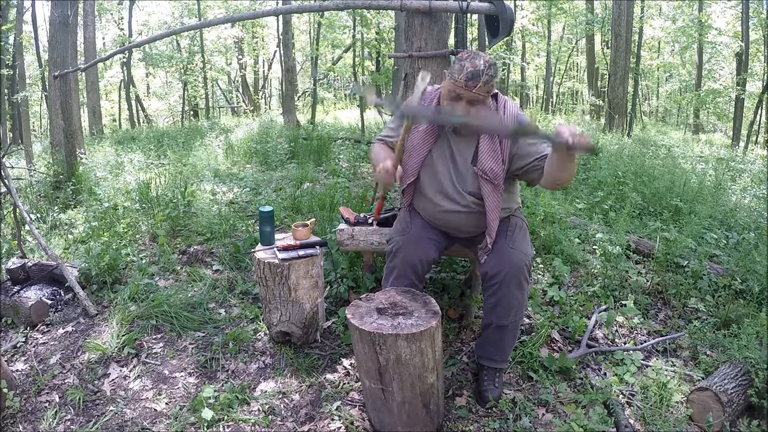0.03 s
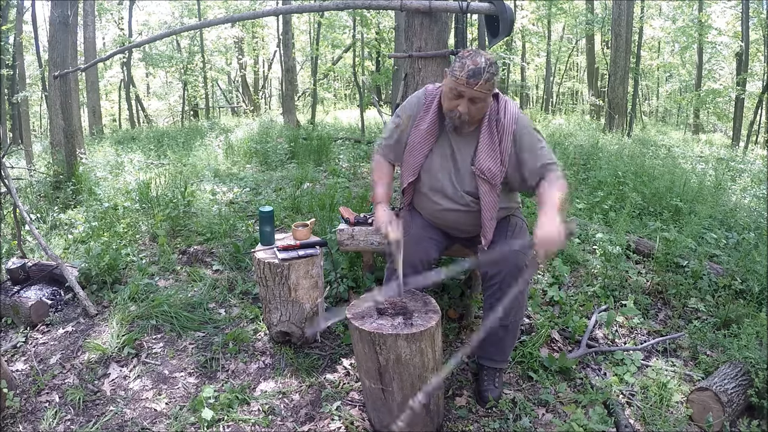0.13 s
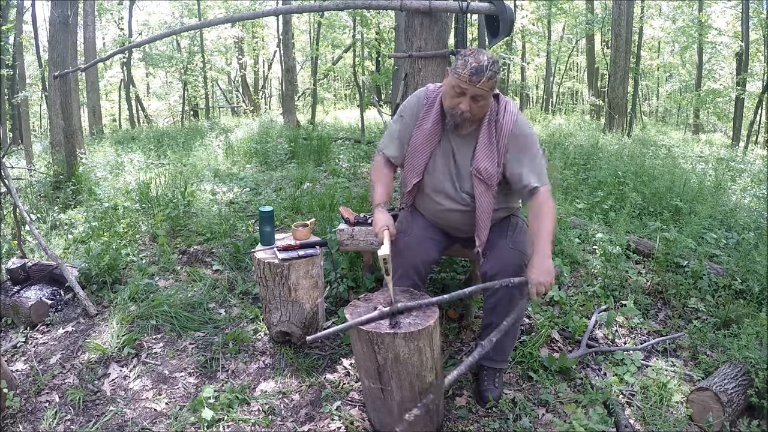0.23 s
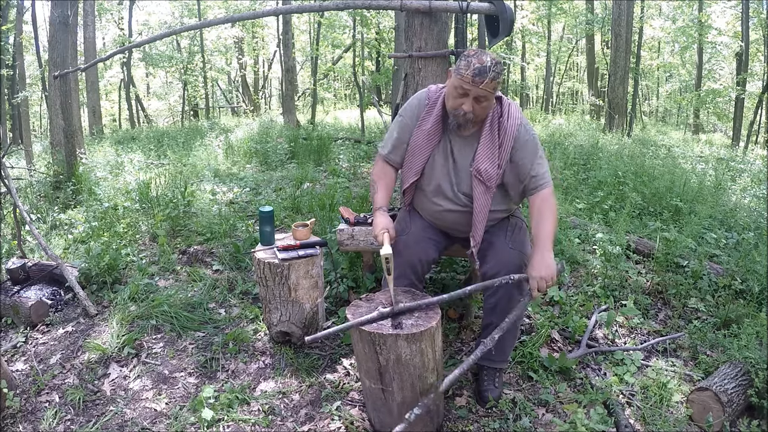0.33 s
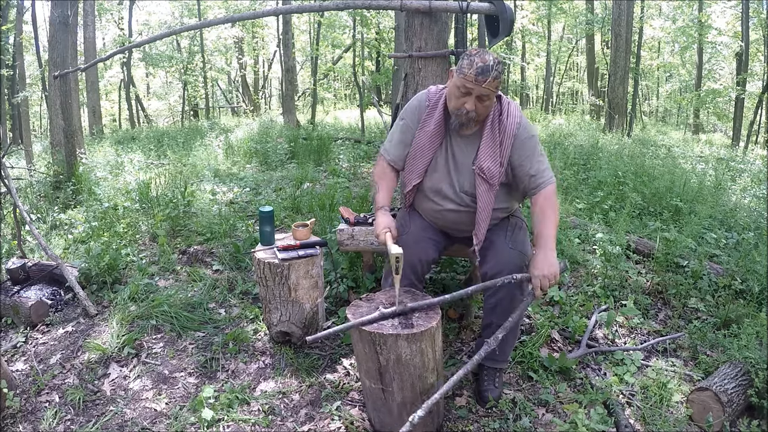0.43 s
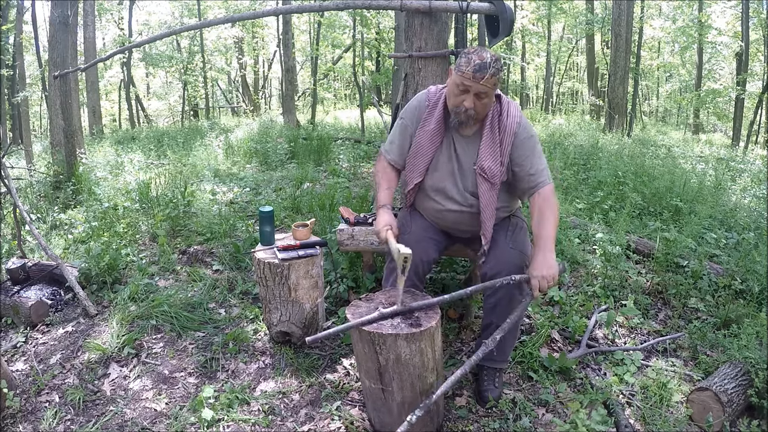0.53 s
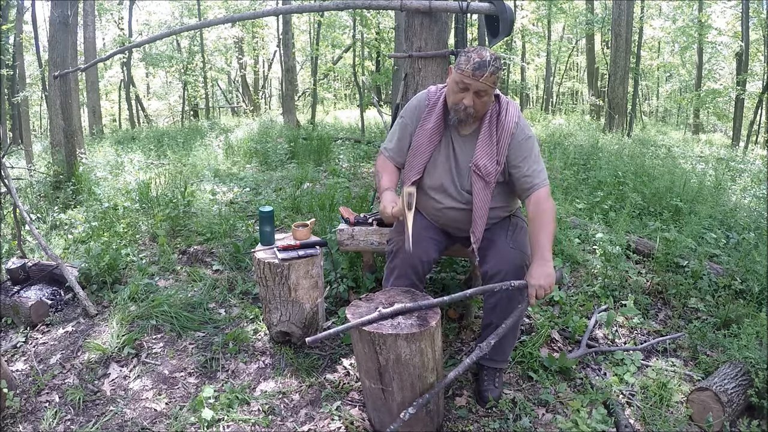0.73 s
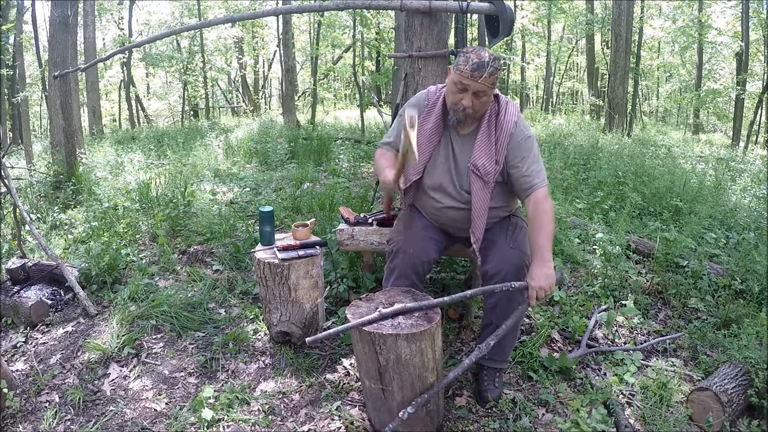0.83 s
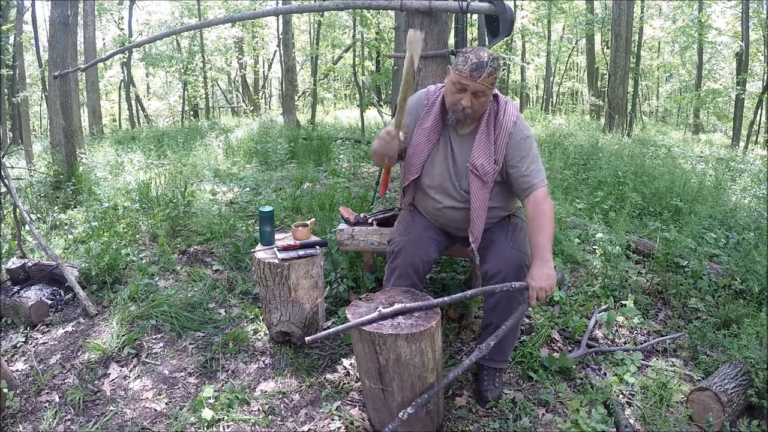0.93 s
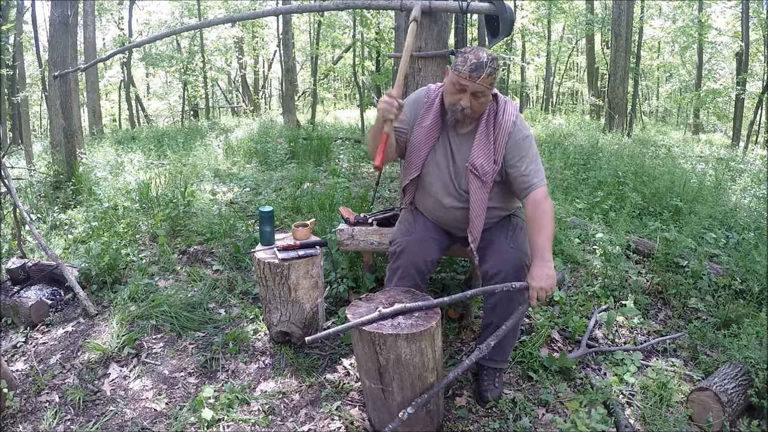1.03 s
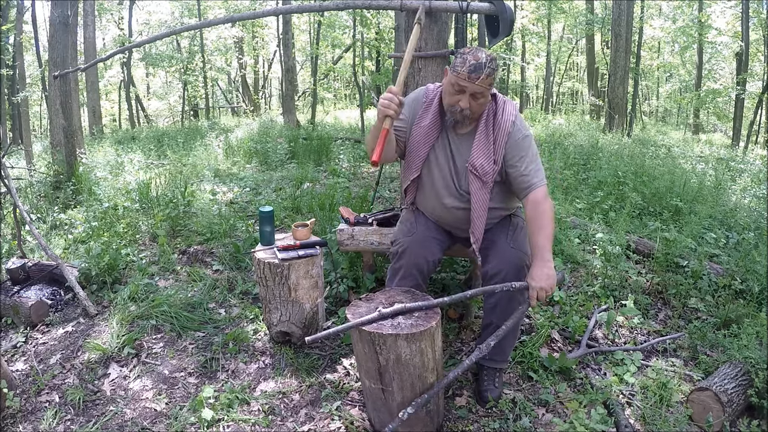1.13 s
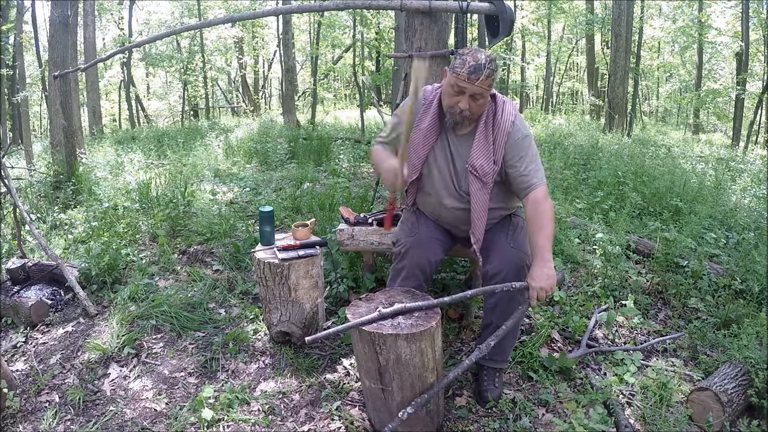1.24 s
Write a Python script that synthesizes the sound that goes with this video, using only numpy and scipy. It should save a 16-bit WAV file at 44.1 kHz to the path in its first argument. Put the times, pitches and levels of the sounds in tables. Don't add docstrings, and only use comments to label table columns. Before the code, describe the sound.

Outdoors in woods, faint rustling precedes one loud, dry, woody hatchet crack at medium distance; the branch knocks back, trees scatter a brief tail, then quiet leaves, tiny ticks, a faint bird and wind buffeting the microphone.

```python
import sys
import numpy as np
from scipy import signal
from scipy.fft import rfft, irfft
from scipy.io import wavfile
from scipy.ndimage import uniform_filter1d

SR = 44100
rng = np.random.default_rng(int(sys.argv[2]) if len(sys.argv) > 2 else 0)


def invert_db(level):
    return 10 ** (np.asarray(level, dtype=float) / 20)


def unload_audio(sound):
    columns = np.transpose(np.atleast_2d(sound))
    steps = np.round(np.clip(columns, -1, 1) * 32767)
    wavfile.write(sys.argv[1], SR, steps.astype(np.int16))


N = 57330

# start in seconds, level in dB, length of the push in ms.
CRACKS = [(.2022, -14.5, 0.29), (0.2044, -14.5, .3), (0.2061, -10.5, 0.41), (.2087, -14.5, .25),
          (.2110, -19, 0.23), (.2160, -18.5, .3), (0.219, -17, .5), (.2240, -13, 0.69),
          (0.2282, -17.5, .48), (.2320, -19.5, .47), (0.2374, -26.5, 0.13), (0.2377, -22, .3),
          (0.241, -21.5, .32), (0.251, -28, 0.69), (.2540, -29, 0.606)]
BLOW_S = CRACKS[0][0]
# frequency in Hz, level in dB, 60 dB decay time in seconds.
WOOD_MODES = [(204, -2.5, 0.14), (254, -3, 0.047), (485, -6.5, 0.017), (616.8, -1.5, 0.081),
              (718.7, 2, .055), (998, -5.5, 0.095), (1122, -0.5, 0.029), (1246, -1, 0.013),
              (1437, -2, 0.024), (1503, 0, 0.062), (1596, 2.5, .05), (2102, -2, 0.073), (2530, -3.5, 0.052),
              (2927, -7.5, 0.031)]
# start in seconds, level in dB, pitch in Hz, 60 dB decay time in seconds.
FIBRE_SPLITS = [(0.202, -17.5, 4270, 0.0074), (0.2025, -14.5, 1620, 0.0035), (.2027, -14.5, 1020, .009),
                (0.2024, -19.5, 2680, 0.0097), (0.2035, -15, 3700, .009), (0.2042, -10.5, 1420, .01),
                (.2040, -26, 5600, .008), (0.206, -15.5, 2122, .009), (.2040, -16.5, 661.7, .02),
                (.2080, -19, 2680, .009), (0.2092, -11.5, 4015, .009), (0.2091, -7.5, 1234, .01),
                (0.209, -7.5, 2902, .014), (.2089, -31, 9000, .006), (.2091, -36, 12500, .005),
                (.2086, -24.5, 6200, .008), (.2100, -19, 202, .06), (.2105, -24.5, 6700, .008),
                (0.2108, -12.5, 1805, .009), (0.2101, -19.5, 5300, .009), (.2120, -15, 2200, .009),
                (0.2127, -17, 2907, .012), (0.2126, -19.5, 3987, .016), (0.2155, -19, 2290, .016),
                (0.2153, -20, 4505, .009), (0.2156, -11, 1110, .009), (0.2166, -16.5, 3240, .009),
                (0.2189, -20, 1116, 0.0082), (0.2189, -25, 2480, .016), (0.2204, -18.5, 495.4, 0.015),
                (0.221, -19.5, 954, .009), (0.2222, -14, 1662, .009), (.2230, -15, 2382, .012),
                (.2239, -20, 750, 0.035), (0.2244, -20, 1180, 0.033), (0.2246, -15, 1471, 0.014),
                (.2250, -21, 3276, 0.0055), (0.2287, -20, 485.4, .028), (.2301, -23, 1662, .028),
                (.2318, -27.5, 740, .028), (.2324, -28.5, 2037, .028), (.2372, -32.5, 4180, .012),
                (.2383, -27, 1596, .028), (0.2399, -28.5, 2490, 0.025), (0.2388, -22.5, 1192, 0.036),
                (0.24, -32.5, 3000, .014), (.2500, -31.5, 800, .02), (0.254, -37, 1190, .016)]
# frequency in Hz, level in dB.
TEAR_SPECTRUM = [(120, -37.5), (200, -6), (899, -7.5), (1160, 1), (1980, -9.5), (2910, -6.5), (14900, -50),
                 (16000, -50.5)]
WOOD_DB, STUMP_CUT_HZ = -21, 170
SPIT_DB, SPIT_T60_S, SPIT_CUT_HZ = -27.5, 0.01, 4900
TEAR_PER_S, TEAR_DB, TEAR_SPREAD_DB, TEAR_HOLD_S, TEAR_T60_S = 3000, -25, 2.5, 0.026, 0.076

# frequency in Hz, level in dB.
TRUNK_SPECTRUM = [(120, -36), (200, 6), (273, -8.5), (1140, -5.5), (1900, -10), (3000, -6), (5400, -14.5),
                  (15000, -46.5)]
# start in seconds, level in dB, 60 dB decay time in seconds.
LATER_RETURNS = [
    (.2560, -55, .12),
    (0.2925, -44.5, 0.049),
    (.3080, -57, 0.05),
    (0.359, -67.5, 0.095),
]
ECHO_DB, ECHO_FLUTTER_DB = -39, 1.2
ECHO_T60_LOW_S, ECHO_T60_MID_S, ECHO_T60_HIGH_S = 0.38, 0.48, 0.25
LATE_DB, LATE_T60_S = -61, 2.5

# start in seconds, level in dB, pitch in Hz, 60 dB decay time in seconds.
KNOCKS = [
    (.2946, -29.5, 1096, 0.027),
    (0.24, -33, 2010, 0.016),
    (.2985, -29, 760, 0.023),
    (.2975, -43, 587, 0.033),
    (0.22, -43.5, 1020, .015),
    (.3110, -39, 740, 0.016),
]
# start in seconds, level in dB, pitch in Hz, 60 dB decay time in seconds.
TWIG_TICKS = [(.0200, -47.5, 3620, 0.02), (0.0201, -52.5, 1750, 0.018), (.0970, -57.5, 3670, 0.02),
              (0.1251, -60, 3730, 0.029), (.1280, -54, 1930, 0.014), (.1450, -56.5, 3000, 0.011),
              (.1550, -58, 3570, 0.014), (0.258, -54.5, 9520, 0.026), (0.276, -42, 4400, 0.016),
              (0.2965, -45, 5100, 0.012), (0.32, -61, 9800, 0.0056), (0.458, -49.5, 8700, 0.0055),
              (0.4592, -53, 3800, 0.014), (0.469, -54.5, 9860, 0.0083), (0.539, -61, 5560, 0.017),
              (.6890, -49, 3540, 0.014), (0.6901, -49.5, 6030, 0.0088), (0.6892, -57, 9800, 0.01),
              (.7770, -59, 3780, 0.0073), (0.911, -61, 1235, 0.021), (1.196, -61.5, 2080, 0.023),
              (1.195, -58.5, 4110, 0.015), (0.912, -66, 3125, 0.012)]
TICK_HISS_DB, TICK_BAND_RATIO = -3, 1.4

# start in seconds, length in seconds, starting pitch in Hz.
WHISTLES = [
    (.582, .15, 2580),
    (.858, .14, 2560),
]
# time in seconds, level in dB.
BIRD_EFFORT = [(.578, -77), (.59, -69), (.62, -66), (.642, -65.5), (.65, -84), (.66, -60), (.672, -77),
               (.685, -71.5), (.72, -68), (.735, -92), (.855, -88), (.87, -74), (.9, -68), (.909, -78),
               (.92, -67), (.945, -68.5), (.975, -75), (1.0, -78)]
SAG_HZ, SAG_POWER = 490, 2.4
BIRD_ECHO_DB, BIRD_T60_S = -5.5, 0.5

# frequency in Hz, level in dB.
LEAF_SPECTRUM = [(88, -27.5), (150, -2.5), (391, -19.5), (475, -16.5), (790, -22), (2450, -26.5),
                 (5050, -30), (12000, -41), (16000, -41)]
# time in seconds, level in dB.
RUSTLE = [
    (0, -64.5),
    (.03, -66),
    (.076, -73),
    (0.128, -66.5),
    (.195, -82),
]
LEAVES_DB, FLICKER_DB = -63.5, 1.2
RUSTLE_DB, GRAIN_DB = -2.5, 2.5

# frequency in Hz, level in dB.
WIND_SPECTRUM = [(8.8, -27), (15, -4), (38, 0.5), (61, -3), (77, -1.5), (119, -22), (300, -46.5),
                 (390, -74), (660, -120)]
# time in seconds, level in dB, pitch of the eddies in Hz,
# level in dB of the broad flow beside them.
GUSTS = [(0, -26, 49.8, -1.5), (.068, -54.5, 58.4, -1), (.1, -40.5, 58.3, 2.5), (.22, -35, 59.6, 2),
         (.285, -29.5, 37.89, -2), (.345, -43, 42.12, -8.5), (.398, -27, 41.15, -16),
         (.444, -43.5, 40.34, -8.5), (.5, -33, 37.03, -3), (.575, -29.5, 47.76, -6),
         (.635, -40, 61.82, -1.5), (.71, -31.5, 55.5, -4.5), (.8, -42, 65.53, 1), (.945, -32, 64.85, -4),
         (.975, -44.5, 60.45, -1.5), (1.08, -33.5, 47.01, -0.5), (1.15, -38, 41.85, -2.5),
         (1.27, -35.5, 56.1, -1)]
# start in seconds, level in dB, length in ms.
BUFFETS = [
    (.305, -31, 7.9),
    (0.514, -31.5, 7.4),
    (.546, -32.5, 6.9),
    (.587, -38.5, 8),
    (1.046, -37.5, 8.2),
    (1.086, -31.5, 11.3),
    (1.196, -36, 8.5),
    (1.217, -29.5, 8),
]
EDDY_WIDTH_HZ, EDDY_DB, EDDY_WANDER_RAD = 10, 2, 0.81
LULL_S, ONSET_DIP, ONSET_S = 0.013, 0.68, 0.006

# start in seconds, end in seconds.
TOP_OPEN = [
    (0, .09),
    (.125, .15),
    (.2, .535),
    (.575, .66),
    (.686, .696),
    (.74, .75),
    (.762, .83),
    (.975, 1.022),
    (1.19, 1.2),
    (1.21, 1.255),
]
TOP_HZ, GATE_HZ, GATE_DB = 15350, 12900, -24


def unit(x):
    return x / np.sqrt(np.mean(x ** 2) + 1e-30)


def colour(x, table):
    hz, db = np.array(table, float).T
    f = np.arange(N // 2 + 1) * SR / N + 1
    log_gain = np.interp(np.log(f), np.log(hz), db) * np.log(10) / 20
    cepstrum = irfft(log_gain, N)
    cepstrum[1:N // 2] *= 2
    cepstrum[N // 2 + 1:] = 0
    return irfft(rfft(x, N) * np.exp(rfft(cepstrum)), N)


def ring(force, modes):
    out = 0
    for hz, db, t60 in modes:
        pole = np.exp(2j * np.pi * hz / SR - np.log(1000) / (max(t60, 0.002) * SR))
        out = out + invert_db(db) * signal.lfilter([1], [1, -pole], force).imag
    return out


def push(start, db, ms):
    u = (np.arange(N) / SR - start) / (max(ms, 0.05) / 1000)
    bump = np.where((u > 0) & (u < 1), np.sin(np.pi * u) ** 2, 0)
    return invert_db(db) * bump / (bump.sum() + 1e-9)


def fade(start, t60, rise=0.0005):
    u = np.maximum(np.arange(N) / SR - start, 0)
    return (1 - np.exp(-u / rise)) * invert_db(-60 * u / t60)


def walk(rate):
    k = int(SR / rate)
    steps = np.repeat(rng.standard_normal(N // k + 1), k)
    smooth = uniform_filter1d(uniform_filter1d(steps, k), k)
    return unit(smooth[:N])


def struck(hits):
    return sum(ring(push(s, db, 0.11), [(hz, 0, t60)]) for s, db, hz, t60 in hits)


def branch_and_stump():
    force = sum((-1) ** k * push(s, db, ms) for k, (s, db, ms) in enumerate(CRACKS))
    return invert_db(WOOD_DB) * ring(force, WOOD_MODES)


def crack_spit():
    noise = unit(signal.lfilter(*signal.butter(2, SPIT_CUT_HZ, fs=SR), rng.standard_normal(N)))
    bursts = sum(invert_db(db + SPIT_DB) / ms * fade(s, SPIT_T60_S, 0.0001) for s, db, ms in CRACKS)
    return noise * bursts


def tearing_fibres():
    happens = rng.random(N) < TEAR_PER_S / SR
    snaps = happens * rng.standard_normal(N) * invert_db(TEAR_SPREAD_DB * rng.exponential(size=N))
    t = np.arange(N) / SR
    envelope = (t > BLOW_S) * invert_db(-60 * np.maximum(t - BLOW_S - TEAR_HOLD_S, 0) / TEAR_T60_S)
    return invert_db(TEAR_DB) * envelope * unit(colour(snaps, TEAR_SPECTRUM))


def blow():
    chop = branch_and_stump() + struck(FIBRE_SPLITS) + crack_spit() + tearing_fibres()
    return signal.lfilter(*signal.butter(2, STUMP_CUT_HZ, "high", fs=SR), chop)


def echo():
    noise = unit(colour(rng.standard_normal(N), TRUNK_SPECTRUM))
    low = signal.sosfilt(signal.butter(2, 1800, fs=SR, output="sos"), noise)
    high = signal.sosfilt(signal.butter(2, 6000, "high", fs=SR, output="sos"), noise)
    mid = noise - low - high
    bands = ((low, ECHO_T60_LOW_S), (mid, ECHO_T60_MID_S), (high, ECHO_T60_HIGH_S))
    tail = sum(band * fade(BLOW_S, t60, 0.0022) for band, t60 in bands)
    returns = (noise - low) * sum(invert_db(db) * fade(s, t60, 0.002) for s, db, t60 in LATER_RETURNS)
    slopes = invert_db(LATE_DB) * noise * fade(BLOW_S, LATE_T60_S, 0.022)
    return invert_db(ECHO_DB + ECHO_FLUTTER_DB * walk(90)) * tail + returns + slopes


def rebound():
    return struck(KNOCKS)


def twigs():
    out = 0
    for s, db, hz, t60 in TWIG_TICKS:
        edges = [hz / TICK_BAND_RATIO, min(hz * TICK_BAND_RATIO, 0.45 * SR)]
        band = signal.butter(3, edges, "band", fs=SR, output="sos")
        spit = unit(signal.sosfilt(band, rng.standard_normal(N))) * fade(s, t60, 0.00035)
        tone = ring(push(s, db, 0.053), [(hz, 0, t60)])
        out = out + tone + invert_db(db + TICK_HISS_DB) * spit
    return out


def bird():
    song, t = 0, np.arange(N) / SR
    for s, length, hz in WHISTLES:
        u = np.clip((t - s) / length, 0, 1)
        pitch = hz - SAG_HZ * u ** SAG_POWER
        song = song + (u > 0) * (u < 1) * np.sin(2 * np.pi * np.cumsum(pitch) / SR)
    effort_db = np.interp(t, *np.array(BIRD_EFFORT).T)
    song = song * invert_db(effort_db + 2 + 1.3 * walk(89.2))
    trees = rng.standard_normal(N) * fade(0.015, BIRD_T60_S, 0.02)
    trees = trees / np.sqrt(np.sum(trees ** 2))
    return song + invert_db(BIRD_ECHO_DB) * signal.fftconvolve(song, trees)[:N]


def leaves():
    air = unit(colour(rng.standard_normal(N), LEAF_SPECTRUM))
    hiss, swell = 0, walk(1.3)
    edges = np.append(100 * 2 ** np.arange(0, 7.6, 0.5), 0.49 * SR)
    for lo, hi in zip(edges[:-1], edges[1:]):
        band = signal.sosfiltfilt(signal.butter(2, [lo, hi], "band", fs=SR, output="sos"), air)
        hiss = hiss + invert_db(0.35 * swell + FLICKER_DB * walk(19)) * band
    return invert_db(LEAVES_DB) * unit(hiss)


def rustle():
    grains = rng.standard_normal(N) * invert_db(GRAIN_DB * rng.exponential(size=N))
    brush = unit(signal.sosfilt(signal.butter(2, [2300, 6500], "band", fs=SR, output="sos"), grains))
    t = np.arange(N) / SR
    return invert_db(np.interp(t, *np.array(RUSTLE).T) + RUSTLE_DB) * brush * (t < BLOW_S)


def wind():
    s, db, eddy_hz, broad_db = np.array(GUSTS).T
    t = np.arange(N) / SR
    phase = 2 * np.pi * np.cumsum(np.interp(t, s, eddy_hz)) / SR
    eddies = np.cos(phase + EDDY_WANDER_RAD * walk(EDDY_WIDTH_HZ)) * invert_db(2 * walk(EDDY_WIDTH_HZ))
    broad = unit(colour(rng.standard_normal(N), WIND_SPECTRUM)) * invert_db(np.interp(t, s, broad_db))
    flow = broad + invert_db(EDDY_DB) * eddies
    flow = flow / (0.3 + np.sqrt(uniform_filter1d(flow ** 2, size=3000)))
    dips = sum(push(at, d, ms) * ms * SR / 2000 for at, d, ms in BUFFETS)
    closing = np.sin(np.pi / 2 * np.clip((t[-1] - t) / LULL_S, 0, 1)) ** 2
    opening = 1 - ONSET_DIP * np.exp(-(t / ONSET_S) ** 2)
    return unit(flow) * invert_db(np.interp(t, s, db)) * closing * opening - dips


def scene():
    chopping = blow() + echo() + rebound()
    woods = twigs() + bird() + leaves() + rustle() + wind()
    return (chopping + woods)[None]


def roll_off(x):
    return signal.sosfilt(signal.butter(12, 16290, fs=SR, output="sos"), x)


def record(dry):
    soft = np.tanh(dry / 0.91) * 0.85
    cut = signal.sosfilt(signal.ellip(8, 0.2, 70, TOP_HZ, fs=SR, output="sos"), soft)
    top = signal.sosfiltfilt(signal.ellip(6, 0.1, 40, GATE_HZ, "high", fs=SR, output="sos"), cut)
    t = np.arange(N) / SR
    is_open = sum(1.0 * ((t >= a) & (t < b)) for a, b in TOP_OPEN)
    shut = 1 - uniform_filter1d(is_open, size=200)
    return roll_off(cut - (1 - invert_db(GATE_DB)) * shut * top)


dry = scene()
out = record(dry)
unload_audio(out)
```